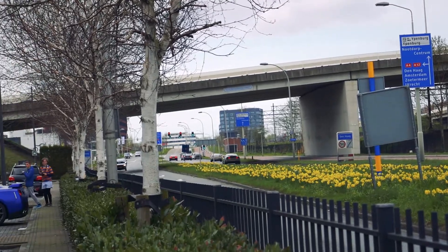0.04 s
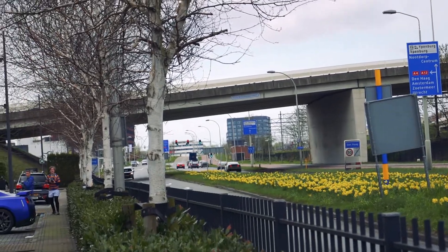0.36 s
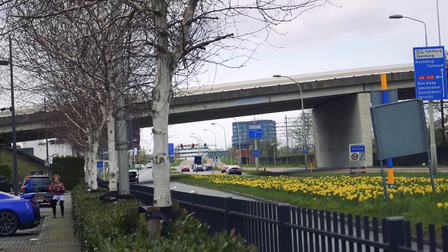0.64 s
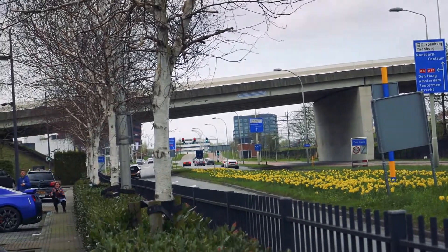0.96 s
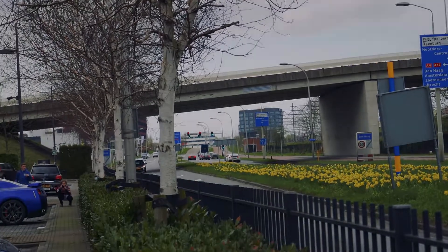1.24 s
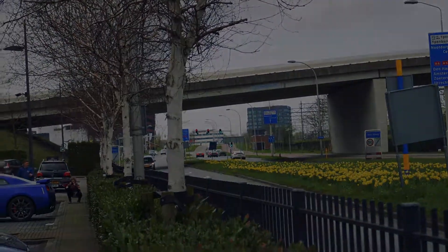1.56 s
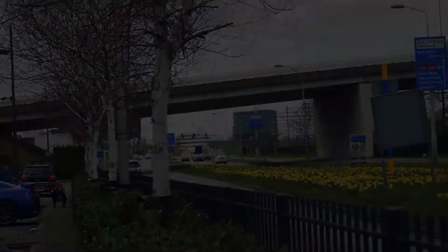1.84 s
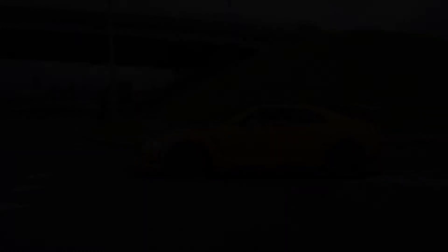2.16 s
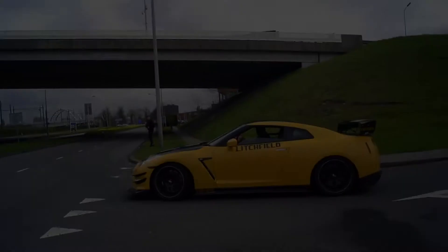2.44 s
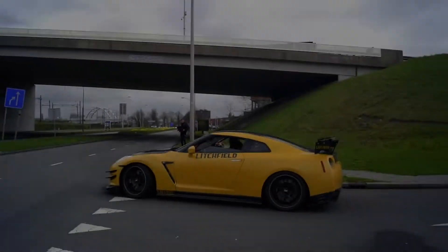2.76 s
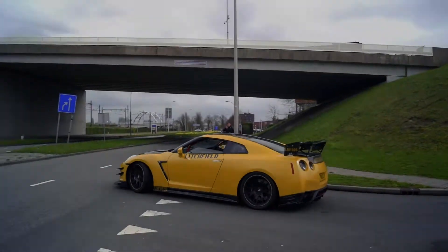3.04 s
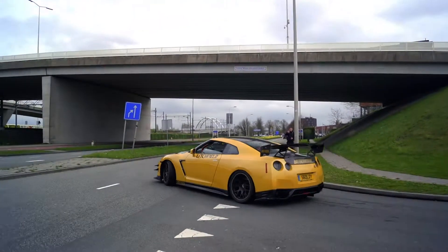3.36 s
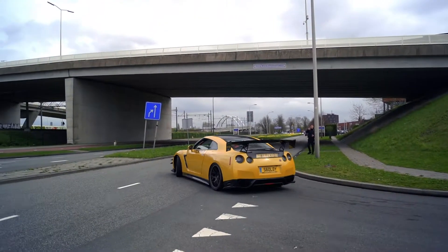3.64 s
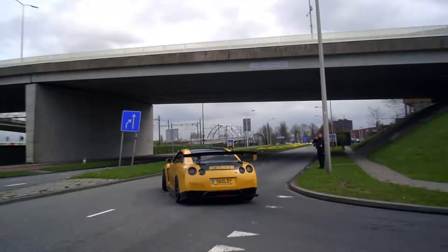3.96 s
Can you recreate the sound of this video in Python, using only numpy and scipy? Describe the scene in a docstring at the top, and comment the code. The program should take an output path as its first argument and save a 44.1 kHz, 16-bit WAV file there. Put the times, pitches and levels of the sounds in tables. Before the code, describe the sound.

A sports car throbs past slowly and pulls away, after distant traffic and wind.

```python
"""First comes distant traffic, heard from under a flyover: engines drone and tyres roar on the road.
After a second, wind swells and puffs on the microphone, there is a dull thud, and tyres hiss as an
engine goes by. Just after two seconds the traffic breaks off and a six-cylinder sports car fades in,
rolling slowly, its firings making the exhaust throb and boom. A second engine idles close by and dies
down. The wind puffs again, and at the end the sports car picks up speed and pulls away."""
import sys
import numpy as np
from scipy import signal
from scipy.fft import rfft, irfft, next_fast_len
from scipy.io import wavfile
from scipy.ndimage import uniform_filter1d, minimum_filter1d, map_coordinates

SR = 44100
rng = np.random.default_rng(int(sys.argv[2]) if len(sys.argv) > 2 else 0)


def bounce(signal):
    """Save signal as a 16-bit WAV file at the path given by the first command-line argument."""
    frames = np.transpose(np.atleast_2d(signal))
    limited = np.clip(frames, -1, 1)
    pcm = np.round(limited * 32767).astype(np.int16)
    wavfile.write(sys.argv[1], SR, pcm)


N = 176400
TIME = np.arange(N) / SR


def amp(db):
    """Turn decibels into a number to multiply by."""
    return 10 ** (np.asarray(db) / 20)


def unit(x):
    """Scale a sound to an average (rms) size of 1."""
    return x / np.sqrt(np.mean(x ** 2) + 1e-20)


def along(points, hz):
    """Read a table of frequencies at hz, giving each octave equal room."""
    f, values = np.transpose(points)
    return np.interp(np.log(hz + 1), np.log(f + 1), values)


def curves(rows):
    """Join a table's rows over time: one smooth line for each later column."""
    times, *columns = np.transpose(rows)
    return [np.interp(TIME, times, column) for column in columns]


def level(rows):
    """Turn a table of times and decibels into a volume for every sample."""
    return amp(curves(rows)[0])


def wobble(rate):
    """A smooth random curve through rate points a second."""
    return map_coordinates(rng.standard_normal(int(N * rate / SR) + 4), [np.arange(N) * rate / SR])


def filtered(x, response):
    """Turn each frequency up or down, or delay it, as response says."""
    size = next_fast_len(N + SR // 2)
    return irfft(rfft(x, size) * response(np.fft.rfftfreq(size, 1 / SR)), size)[..., :N]


def noise(spectrum, alike):
    """Stereo noise; a likeness of 1 is the same in both ears, -1 is opposite."""
    def shape(hz):
        angle = np.arccos(np.clip(along(alike, hz), -1, 1)) / 2
        return amp(along(spectrum, hz)) * np.array([np.cos(angle), np.sin(angle)])
    mid, side = filtered(rng.standard_normal((2, N)), shape)
    return np.array([mid + side, mid - side]) / mid.std()


def place(x, pan_db, lag_ms):
    """Make the left side louder by pan_db and later by lag_ms."""
    sides = np.array([[.5], [-.5]])
    return amp(pan_db * sides) * filtered(x, lambda hz: np.exp(-2j * np.pi * hz * sides * lag_ms / 1000))


def tone(cycles, flutter_db, drift):
    """One engine tone, a little unsteady in loudness and pitch."""
    return np.sqrt(2) * amp(flutter_db * wobble(16)) * np.cos(2 * np.pi * cycles + drift * wobble(15))


# Firing rate and loudness of two far engines: t/s, f/Hz, level/dB
FIRST_DRONE = [(0,139.5,-29),(.4,139.1,-30),(.8,137,-30),(1.1,138.5,-36.5),(1.5,144.5,-46),(2.15,148.5,-41)]
SECOND_DRONE = [(0,78,-43),(.5,79.4,-38),(.75,79.5,-39),(1,79.84,-34),(2.15,82.6,-31)]
# The first one's tone an octave up: t/s, level/dB
FIRST_OCTAVE = [(0,-42),(.42,-33),(1.1,-40),(1.45,-37),(1.7,-28.5),(1.9,-32),(2.15,-38)]
# The second is heard only by its overtones: multiple of the firing rate, level/dB
SECOND_OVERTONES = [(3,-8.5),(4,-1.5),(6,-12),(8,-14.5)]
def far_engines():
    """Two engines drone in the distance, their sound wavering on the way."""
    hz, db = curves(FIRST_DRONE)
    cycles = np.cumsum(hz) / SR
    first = amp(db) * tone(cycles, flutter_db=1.1, drift=.12)
    first += level(FIRST_OCTAVE) * tone(2 * cycles, flutter_db=2.6, drift=.4)
    hz, db = curves(SECOND_DRONE)
    cycles = np.cumsum(hz) / SR
    second = sum(amp(db + k_db) * tone(k * cycles, flutter_db=2.5, drift=.31)
                 for k, k_db in SECOND_OVERTONES)
    return place(first + second, pan_db=-.5, lag_ms=.13)


# Loudness of the main road: t/s, roar level/dB, rumble level/dB
TRAFFIC = [(0,-37,-48),(.55,-33.5,-42),(1,-32,-38.5),(2.15,-32.5,-37.5)]
# Tyre hiss of a car passing far off: t/s, level/dB
FAR_HISS = [(0,-56.5),(.7,-62),(.95,-49.5),(1.3,-42.5),(1.6,-44.5),(2.15,-58)]
# How much bass and treble each noise has: f/Hz, level/dB
ROAR_COLOUR = [(220,-30),(380,-4),(540,-7),(950,-4.5),(1400,-8.5),(2050,-11.5),(2700,-18.5),(4100,-26.5),(6500,-41),(8500,-50),(15400,-56)]
FAR_HISS_COLOUR = [(2000,5.5),(4000,-11),(4900,-3),(6900,-1.5),(8400,-15.5),(11500,-17.5),(15500,-32)]
RUMBLE_COLOUR = [(20,-20),(40,1),(68,14.5),(110,6),(200,1.5),(400,-36)]
# How alike the two ears hear them: f/Hz, likeness
FAR_ALIKE = [(60,1),(300,0.5),(1000,0.74),(3000,0.57),(12000,1)]
def far_road():
    """Tyres roar, hiss and rumble on the main road."""
    roar_db, rumble_db = curves(TRAFFIC)
    roar = amp(roar_db + .52 * wobble(11.97)) * noise(ROAR_COLOUR, FAR_ALIKE)
    hiss = level(FAR_HISS) * noise(FAR_HISS_COLOUR, FAR_ALIKE)
    rumble = amp(rumble_db) * noise(RUMBLE_COLOUR, FAR_ALIKE)
    return (place(roar, pan_db=-5, lag_ms=.087) + place(hiss, pan_db=-7.5, lag_ms=.04)
            + place(rumble, pan_db=0, lag_ms=.11))


# Loudness of the wind: t/s, level/dB
WIND_LEVEL = [(0,-37),(.8,-37),(1.25,-29.5),(1.7,-35.5),(2.15,-36)]
# Its deep colour: f/Hz, level/dB
WIND_COLOUR = [(60,-18),(120,1),(220,-4),(340,-2.5),(450,-21.5),(900,-77)]
# How alike the two ears hear it: f/Hz, likeness
WIND_ALIKE = [(60,0.8),(200,0.35),(500,0.97)]
def wind_rush():
    """A low rush swells as wind blows on the microphone."""
    return place(level(WIND_LEVEL) * noise(WIND_COLOUR, WIND_ALIKE), pan_db=0, lag_ms=.11)


# Colour of the background hiss: f/Hz, level/dB
AIR_COLOUR = [(2200,-17),(3400,8.5),(4400,6.5),(6000,-3),(15500,-15.5)]
def open_air():
    """The open air hisses faintly and steadily."""
    return place(amp(-54) * noise(AIR_COLOUR, FAR_ALIKE), pan_db=-5.5, lag_ms=.054)


# Firing rate and loudness of a passing engine: t/s, f/Hz, level/dB
PASSING = [(1.1,73,-39.5),(1.4,71,-32),(1.8,61.5,-35),(2.15,52,-35.5)]
# Its tones at 1, 2 and 3 times that rate: level/dB
PASSING_TONES = [-9,-2,-6]
def passing_engine():
    """An engine's note sinks as it goes by on the main road."""
    hz, db = curves(PASSING)
    cycles = np.cumsum(hz) / SR
    return sum(amp(db + k_db) * tone(k * cycles, flutter_db=2, drift=.2)
               for k, k_db in enumerate(PASSING_TONES, 1))


# Puffs of wind: t/s, half length/s, level/dB
PUFFS = [(1.16,0.061,-24),(1.34,.05,-26.5),(3.08,.04,-17),(3.299,0.14,-20),(3.478,0.048,-18),(3.675,0.039,-25)]
# How alike the two ears hear them: f/Hz, likeness
PUFF_ALIKE = [(200,-0.72)]
def wind_puffs():
    """Short puffs flutter on the microphone, pushing left and right against each other."""
    gusts = sum(amp(db) * np.exp(-((TIME - s) / half_s) ** 2) for s, half_s, db in PUFFS)
    return gusts * unit(noise(WIND_COLOUR, PUFF_ALIKE))


def thud(at_s=1.182, width_s=.0016):
    """One dull thud among the traffic: a single push and pull of air."""
    offset = (TIME - at_s) / width_s
    return -amp(-7.5) * offset * np.exp(-offset ** 2)


# The sports car's six cylinders: strength, lateness/gaps between firings
CYLINDERS = [(0.98,-0.005),(0.25,-0.0029),(0.96,-0.024),(0.7,0.021),(0.93,0.00032),(0.28,0.029)]
def firings(cycles, scatter, jitter):
    """The cylinders pop in turn; scatter varies each pop's size and jitter its timing."""
    count = np.arange(int(cycles[-1]))
    size, late = np.array(CYLINDERS)[count % len(CYLINDERS)].T
    chance = rng.standard_normal((len(count), 2))
    at = np.interp(count + late + jitter * chance[:, 0], cycles, np.arange(N))
    return np.bincount(at.astype(int), size + scatter * chance[:, 1], N)


def resonate(pops, notes):
    """Pops make a hollow part ring at its own notes."""
    def response(f):
        return sum(amp(db) * (2j * f * width / (hz * hz - f * f + 2j * f * width)) ** 2
                   for hz, width, db in notes)
    return unit(filtered(pops, response))


def throb(cycles, depth=.35, lag=.7):
    """One row of cylinders is louder, so the boom swells just after every second firing."""
    return (1 + depth * np.cos(np.pi * (cycles - lag))) * amp(wobble(20))


# The car's tones at 1, 2 and 3 times its firing rate: t/s, level/dB
FIRING_TONE = [(2.7,-34),(2.87,-13.5),(3.2,-11.5),(3.5,-14),(3.7,-13.5),(3.8,-17),(3.9,-14)]
OCTAVE = [(2.45,-23.5),(2.8,-19),(2.92,-28.5),(3.15,-28.5),(3.4,-31),(3.62,-23.5),(3.77,-20.5),(4,-22)]
THIRD_TONE = [(2.95,-24.5),(3.25,-36),(3.76,-37),(3.84,-30.5)]
# The muffler's burble and the tailpipe's boom: t/s, level/dB
BURBLE = [(2.3,-21),(2.52,-16.5),(2.72,-17),(2.95,-20),(3.15,-21),(3.35,-29.5),(4,-28.5)]
BOOM = [(2.3,-31.5),(2.7,-26.5),(2.95,-22),(3.2,-23.5),(3.32,-19.5),(3.55,-20.5),(3.78,-22.5),(3.83,-28.5),(3.94,-29.5),(4,-19)]
# The notes those two parts ring at: f/Hz, width/Hz, level/dB
MUFFLER_NOTES = [(113,31,-1.7),(158.7,23,-1.8),(219.3,36.8,0.79),(269.6,25.3,-2)]
TAILPIPE_NOTES = [(352.4,22.8,10.5),(378.5,6.2,-0.5),(320,16,-4),(640,110,-31)]
def exhaust(cycles):
    """Firings hum, burble in the muffler, echo under the flyover and boom in the tailpipe."""
    hum = level(FIRING_TONE) * tone(cycles, flutter_db=.8, drift=.08)
    overtones = level(THIRD_TONE) * tone(3 * cycles, flutter_db=4, drift=.25)
    overtones -= level(OCTAVE) * tone(2 * cycles, flutter_db=1.9, drift=.13)
    direct = resonate(firings(cycles, scatter=.57, jitter=.088), MUFFLER_NOTES)
    ragged = lambda: sum(firings(cycles, scatter=.4, jitter=.45) for _ in range(4))
    echoes = np.array([resonate(ragged(), MUFFLER_NOTES) for ear in range(2)])
    burble = level(BURBLE) * unit(direct + .83 * echoes)
    boom = level(BOOM) * throb(cycles)
    boom *= resonate(firings(cycles, scatter=.12, jitter=.01), TAILPIPE_NOTES)
    return (place(hum, pan_db=-4, lag_ms=1.6) + place(overtones, pan_db=-4, lag_ms=1.11)
            + place(burble, pan_db=-8.5, lag_ms=.3) + place(boom, pan_db=-3.5, lag_ms=.28))


def shimmer(x, depth_db):
    """Thin slices of the sound swell and sink as echoes shift around the moving car."""
    bands = signal.stft(x, nperseg=512)[2]
    swells = rng.standard_normal(bands.shape[1:])
    for _ in range(2):
        swells = uniform_filter1d(swells, size=2, axis=0)  # smooth across pitch
        swells = uniform_filter1d(swells, size=50, axis=1)  # and over time
    bands = bands * amp(depth_db * unit(swells))
    return unit(signal.istft(bands, nperseg=512)[1][:, :N]) * x.std()


# Noise of the rolling car: t/s, tyre and engine-bay level/dB, exhaust hiss level/dB
ROLLING = [(2.3,-28.5,-78),(2.6,-28,-50.5),(3,-30,-45.5),(3.3,-32,-48.5),(3.6,-31.5,-49),(4,-28.5,-45)]
# Rush of gas as the driver speeds up: t/s, level/dB
THROTTLE = [(2.3,-52),(3.55,-48),(3.72,-42),(3.86,-34.5),(4,-37.5)]
# How much bass and treble each noise has: f/Hz, level/dB
TYRE_COLOUR = [(280,-38),(440,-4),(530,-12),(640,-6.5),(1380,-12.5),(2000,-12),(2700,-18.5),(3400,-26),(4200,-28),(12000,-47.5)]
EXHAUST_HISS_COLOUR = [(2500,-14),(4200,0.5),(5600,-5),(6800,-0.5),(8300,-4.5),(10000,-1),(13000,-7.5),(15600,-13)]
GAS_COLOUR = [(900,-9),(1800,-12),(2500,2.5),(2950,-4.5),(3300,-1),(3750,-8),(4150,-5.5),(4500,-10),(4950,-8),(5400,-14),(5850,-12.5),(10000,-17.5),(15500,-27)]
# How alike the two ears hear them: f/Hz, likeness
NEAR_ALIKE = [(60,0.57),(150,0.83),(1500,0.73),(5000,0.52)]
HISS_ALIKE = [(1000,1),(3000,0.97),(6000,0.66),(15000,0.89)]
def tyres_and_gas(cycles, echo_s=.001198, echo_share=.48, echo_dull_hz=6500):
    """Tyres roar and rumble, while gas hiss pulses with the firings and bounces off the road."""
    def road_echo(hz):
        return echo_share / (1 + (hz / echo_dull_hz) ** 2) * np.exp(-2j * np.pi * hz * echo_s)
    tyre_db, hiss_db = curves(ROLLING)
    tyres = amp(tyre_db + wobble(40)) * noise(TYRE_COLOUR, NEAR_ALIKE)
    gas = amp(hiss_db) * noise(EXHAUST_HISS_COLOUR, HISS_ALIKE)
    gas += level(THROTTLE) * noise(GAS_COLOUR, HISS_ALIKE)
    gas *= (1 + .26 * np.cos(2 * np.pi * cycles)) * amp(1.13 * wobble(30.04))
    gas += filtered(gas, road_echo)
    rumble = amp(-29) * noise(RUMBLE_COLOUR, NEAR_ALIKE)
    return (place(shimmer(tyres, depth_db=1.2) + rumble, pan_db=-3.5, lag_ms=.04)
            + place(shimmer(gas, depth_db=2.2), pan_db=-.5, lag_ms=.0042))


# A nearby engine's firing rate and tones: t/s, f/Hz, level/dB at f, level/dB at 4 times f
IDLER = [(2.45,56.96,-27,-26),(2.66,53.25,-20,-19.5),(2.8,50.6,-16.5,-26),(2.95,49.8,-38,-37)]
def idling_engine():
    """A second engine settles to idle, its note beating against the sports car's."""
    hz, hum_db, overtone_db = curves(IDLER)
    cycles = np.cumsum(hz) / SR
    hum = amp(hum_db) * tone(cycles, flutter_db=1, drift=.1)
    overtone = amp(overtone_db) * tone(4 * cycles, flutter_db=1, drift=.1)
    return place(hum + overtone, pan_db=-4, lag_ms=.76)


# The exhaust's higher notes: f/Hz, width/Hz, level/dB
RASP_NOTES = [(629,45,0.5),(790,86,-5),(1117,76,-8.5)]
# How loudly they ring: t/s, level/dB
RASP_LEVEL = [(2.45,-53),(2.7,-35),(3.6,-35.5),(4,-33.5)]
def rasp(cycles):
    """Uneven firings ring the higher notes of the exhaust."""
    ring = resonate(firings(cycles, scatter=.59, jitter=.034), RASP_NOTES)
    return place(level(RASP_LEVEL) * ring, pan_db=-4, lag_ms=.06)


# Snaps of grit: t/s, level/dB
SNAPS = [(2.593,-30),(3.091,-29.5),(3.094,-33)]
# Their bright colour: f/Hz, level/dB
GRIT_COLOUR = [(1200,-13),(4500,3),(15500,-22)]
def grit(decay_s=.0016):
    """Bits of grit snap under the tyres, each a tiny burst of noise."""
    snaps = sum(amp(db) * (TIME >= s) * np.exp(-np.abs(TIME - s) / decay_s) for s, db in SNAPS)
    return snaps * noise(GRIT_COLOUR, HISS_ALIKE)


# Overtones of the hard-working engine: multiple of the firing rate, level/dB
GROWL_OVERTONES = [(4,-1),(4.5,1),(5,-3)]
def growl(cycles):
    """As the driver speeds up, the engine's higher tones stand out clearly."""
    tones = sum(amp(db) * tone(k * cycles, flutter_db=1, drift=.1) for k, db in GROWL_OVERTONES)
    return place(level(THROTTLE) * tones, pan_db=-1, lag_ms=.2)


# How fast the sports car's engine fires: t/s, f/Hz
FIRING_RATE = [(2.45,45.02),(2.56,49.86),(2.66,55.96),(2.8,60.48),(2.96,63.46),(3.1,60.16),(3.35,63.71),(3.55,64.4),(3.69,67.32),(3.82,76.9),(3.9,80.1),(4,77.9)]
# Fade-in of the car and the idling engine: t/s, level/dB
FADE_IN = [(2.16,-53),(2.2,-46),(2.27,-28.5),(2.35,-20),(2.43,-11.5),(2.48,-3),(2.53,-2.5)]
def scene(cut_s=2.165, fade_out_s=.017):
    """The traffic and the wind's rush break off, then the sports car fades in; wind puffs over both."""
    cycles = np.cumsum(curves(FIRING_RATE)[0]) / SR  # firings so far
    roadside = open_air() + far_engines() + passing_engine() + far_road() + wind_rush() + thud()
    near = exhaust(cycles) + growl(cycles) + rasp(cycles) + tyres_and_gas(cycles)
    near += grit() + idling_engine()
    fade_out = np.clip((cut_s - TIME) / fade_out_s, 0, 1) ** 2
    fade_in = (TIME > cut_s) * level(FADE_IN)
    return fade_out * roadside + fade_in * near + wind_puffs()


def record(dry, ceiling=.92, top_hz=15750):
    """A limiter turns down the loudest peaks, then the very highest treble is cut off."""
    needed = ceiling / np.maximum(np.abs(dry).max(axis=0), ceiling)
    gain = uniform_filter1d(minimum_filter1d(needed, size=900), size=450)
    return filtered(dry * gain, lambda hz: hz < top_hz)


dry = scene()
out = record(dry)
bounce(out)
```